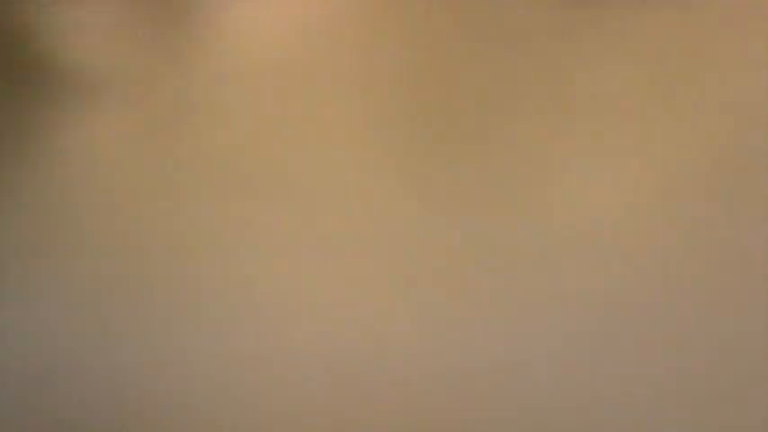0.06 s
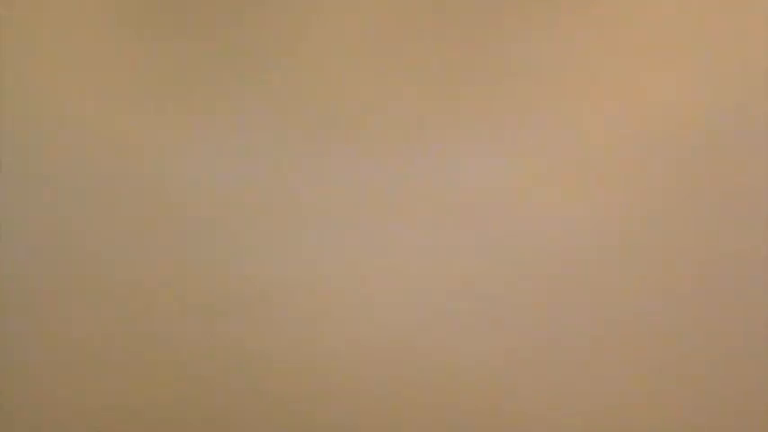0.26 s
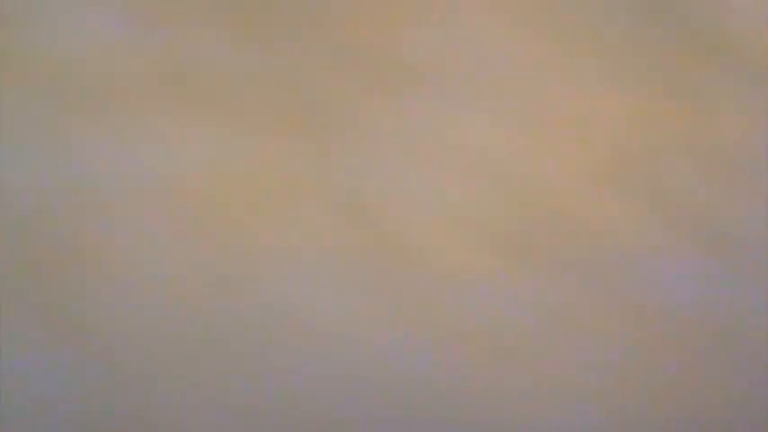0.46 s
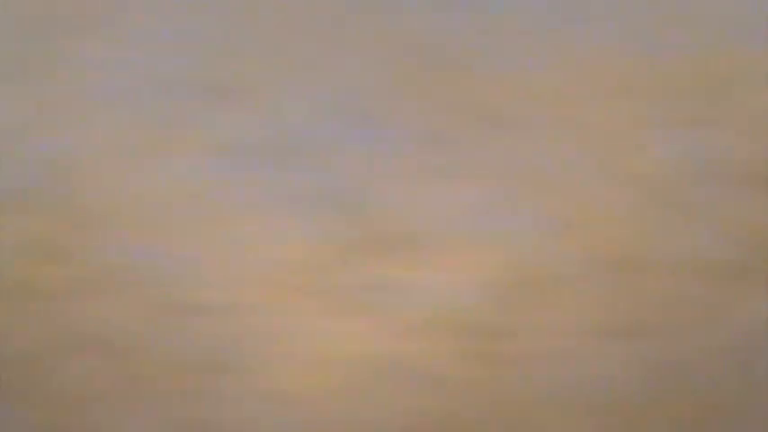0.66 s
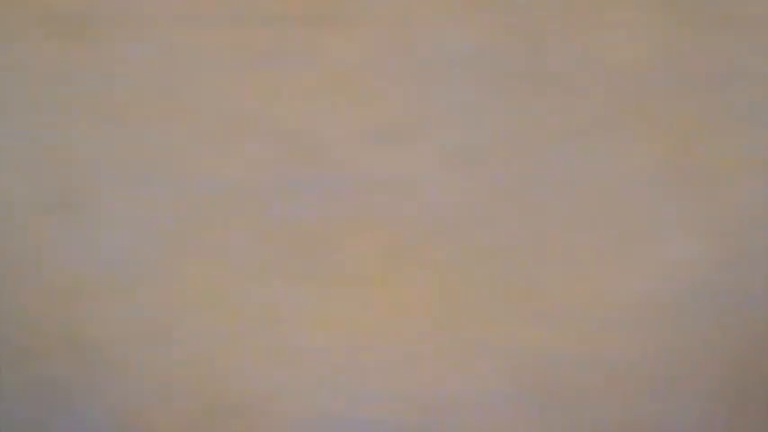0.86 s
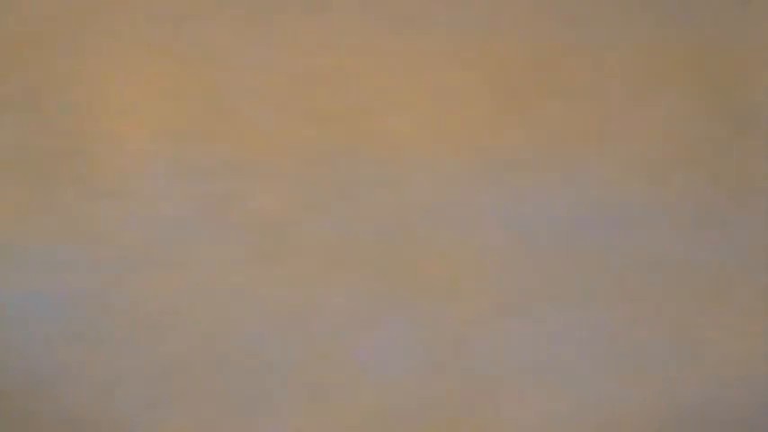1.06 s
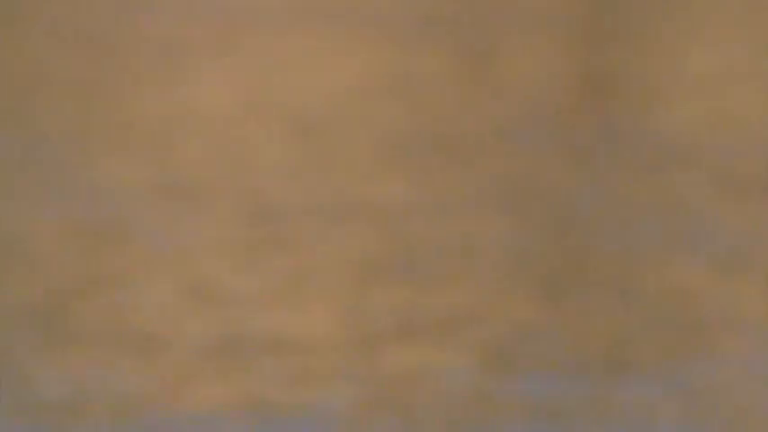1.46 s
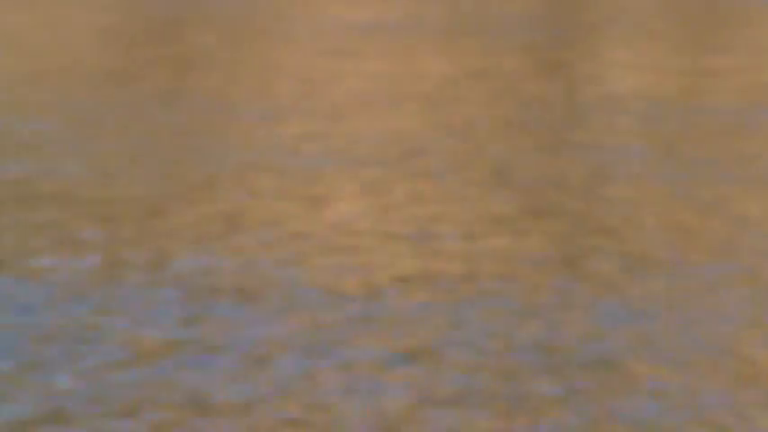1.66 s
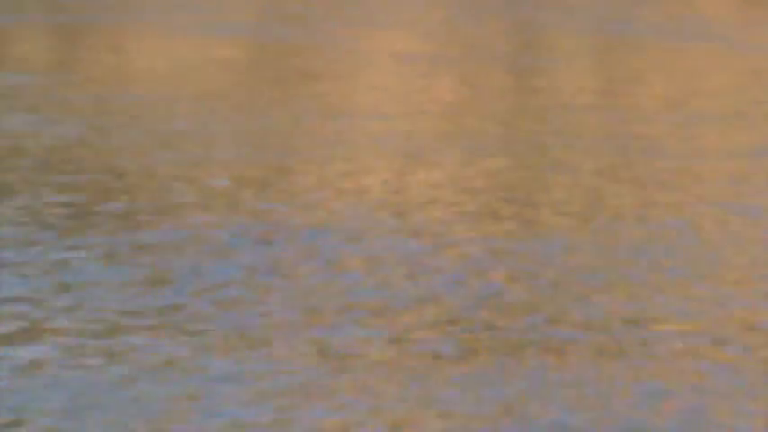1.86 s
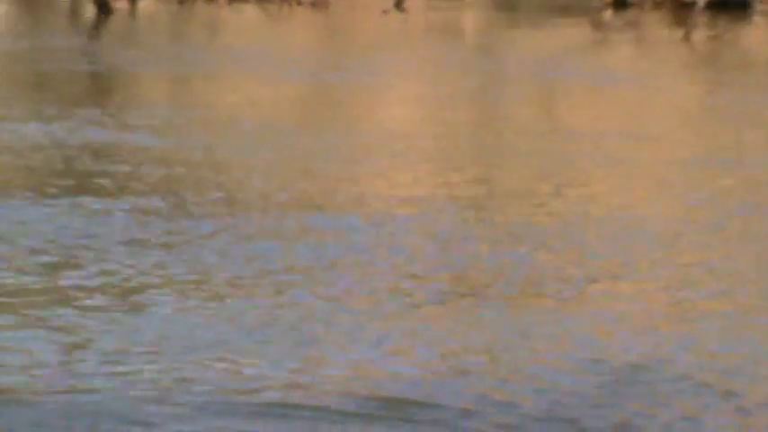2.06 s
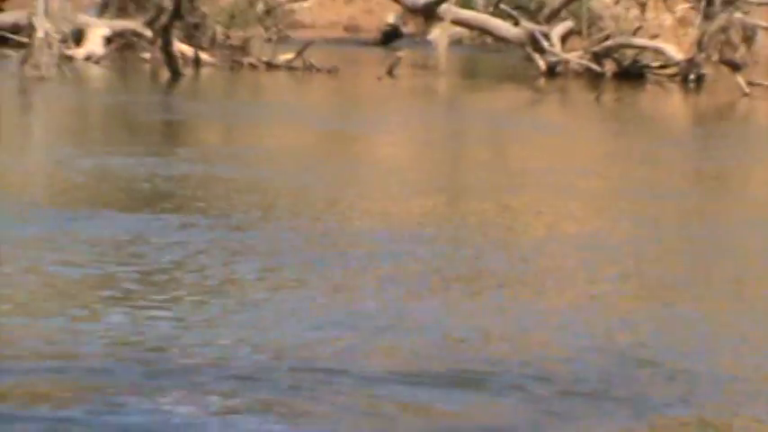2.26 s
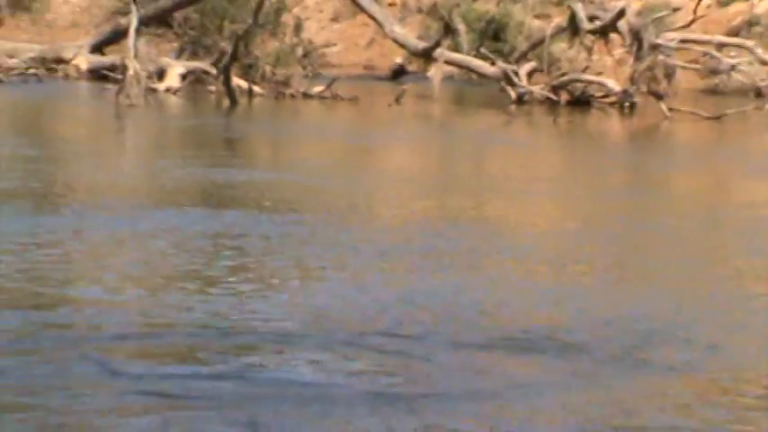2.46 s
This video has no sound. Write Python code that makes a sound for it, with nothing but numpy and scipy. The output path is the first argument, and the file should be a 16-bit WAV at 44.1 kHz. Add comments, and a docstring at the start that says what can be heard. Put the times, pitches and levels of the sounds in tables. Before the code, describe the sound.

A camera is bumped twice, over faint river wash and soft wind rumble on the microphone.

```python
"""Light gusts rumble on the microphone of a hand-held camera, over a quiet river wash and hiss.
Right at the microphone the camera's drive hums and the grip rustles; crickets trill faintly on the bank.
The camera is bumped twice in the first half second: its plastic shell scuffs and knocks, a finger rubs,
then a hard part snaps home. A dry scrape and small ticks follow; lens motors whirr in the second half."""
import sys
import numpy as np
from scipy import signal
from scipy.fft import rfft, irfft, next_fast_len
from scipy.io import wavfile

SR = 44100
rng = np.random.default_rng(int(sys.argv[2]) if len(sys.argv) > 2 else 0)


def generate_wav(signal):
    """Clip the signal to [-1, 1] and save it as 16-bit WAV at the path in sys.argv[1]."""
    frames = np.transpose(np.atleast_2d(signal))
    scaled = np.clip(frames, -1, 1) * 32767
    pcm = np.round(scaled).astype(np.int16)
    wavfile.write(sys.argv[1], SR, pcm)


N = 110250
T = np.arange(N) / SR


def from_db(db):
    """Decibels to gain."""
    return 10 ** (np.asarray(db) / 20)


def rms_one(x):
    """Scale to rms 1."""
    return x / np.sqrt(np.mean(x ** 2) + 1e-20)


def panned(db):
    """Left and right gains for a pan in dB, positive to the left."""
    return from_db(np.array([[.5], [-.5]]) * db)


def in_time(rows):
    """Each column of a curve at every sample."""
    s, *columns = np.transpose(rows)
    return [np.interp(T, s, c) for c in columns]


def at_hz(points, hz):
    """Read a spectrum on a log-frequency axis."""
    f, value = np.transpose(points)
    return np.interp(np.log(hz), np.log(f), value)


def drift(rate_hz):
    """A smooth random wander with spread 1."""
    step, settle = 40, 2000
    r = np.exp(-2 * step * np.pi * rate_hz / SR)
    white = rng.standard_normal(N // step + settle + 2)
    slow = signal.lfilter([1], [1, -2 * r, r * r], white)[settle:]
    return np.interp(np.arange(N) / step, np.arange(len(slow)), rms_one(slow))


def click(s):
    """One unit click at s seconds."""
    out = np.zeros(N)
    out[int(np.clip(s * SR, 0, N - 1))] = 1
    return out


def swell(s, rise, fall):
    """Exponential rise to 1 at s seconds, then exponential fall."""
    return np.exp(-np.maximum((s - T) / rise, (T - s) / fall))


def ring(clicks, hz, t60):
    """A unit click sets a sine of height 1 ringing."""
    r, w = np.exp(-np.log(1000) / (t60 * SR)), 2 * np.pi * hz / SR
    return signal.lfilter([0, np.sin(w)], [1, -2 * r * np.cos(w), r * r], clicks + 1e-18)


def above(x, hz, order):
    """High-pass."""
    return signal.sosfilt(signal.butter(order, hz, "high", fs=SR, output="sos"), x + 1e-18)


def narrow_noise(phase, width_hz):
    """A tone that wavers at random in level and phase; rms 1."""
    return drift(width_hz) * np.cos(phase) + drift(width_hz) * np.sin(phase)


def banded_noise(spectrum, likeness, flicker_db):
    """Stereo noise in flickering half-octave bands; rms 1."""
    # Each row: frequency in Hz, then relative density in dB (spectrum) or left-right correlation (likeness).
    edges = 18 * 2 ** np.arange(0, 10.1, .5)
    out, white = 0, rng.standard_normal((2, 2, N))
    for k, (low, high) in enumerate(zip(edges, edges[1:])):
        if high < spectrum[0][0] or low > spectrum[-1][0]:
            continue
        band = signal.butter(2, [low, high], "band", fs=SR, output="sos")
        mid, side = signal.sosfilt(band, white[k % 2])
        hz = np.sqrt(low * high)
        alike = np.clip(at_hz(likeness, hz), -1, 1)
        gain = from_db(at_hz(spectrum, hz) + flicker_db * drift(10.0))
        out = out + gain * (np.sqrt(1 + alike) * mid + np.sqrt(1 - alike) * side * [[1], [-1]])
    return rms_one(out)


def wind():
    """Gusts blow straight across the microphone ports in a lumpy rumble."""
    # Each row: time in seconds, level in dB, pan in dB.
    gusts = [(0.0, -55, 7), (0.04, -55, -2.5), (0.26, -61, 2.5), (0.38, -50.5, -0.5), (0.45, -50, -2.5),
             (0.47, -64, -1.5), (1.01, -64.5, 0.5), (1.05, -57, 1), (1.25, -62, -1), (1.34, -43, 2),
             (1.44, -44, -3.5), (1.47, -51.5, 3), (1.59, -36.5, -3.5), (1.66, -52.5, 13), (1.675, -46, 6),
             (1.72, -63, -0.5), (1.96, -53, 1), (2.05, -57.5, 0), (2.08, -43.5, -0.5), (2.15, -44.5, -9),
             (2.19, -52.5, 6), (2.21, -43.5, 2.5), (2.255, -43.5, -7.5), (2.31, -62.5, 2), (2.5, -66, -4)]
    # The rumble. Each row: frequency in Hz, relative density in dB.
    spectrum = [(20, 0), (40, 3.5), (90, -3), (160, -12.5), (300, -27.5), (500, -40.5), (900, -48)]
    # Each row: frequency in Hz, correlation between the ports.
    likeness = [(30, 1), (70, 0.66), (400, 0.42)]
    gust_db, pan_db = in_time(gusts)
    return from_db(gust_db + 0.5) * panned(pan_db) * banded_noise(spectrum, likeness, flicker_db=0)


def wash():
    """Quiet moving water and even hiss, heard wide from the bank."""
    # Each row: frequency in Hz, relative density in dB.
    spectrum = [(100, -5), (300, -10.5), (450, -9), (600, -7), (850, -5), (1200, -5), (2000, -8),
                (2800, -12.5), (6300, -14.5), (7500, -18), (9000, -21), (11000, -22.5), (12300, -20.5),
                (16000, -23.5)]
    # Each row: time in seconds, level in dB.
    level = [(0, -60), (.4, -58.5), (.6, -63), (1.1, -62), (1.6, -61), (2.5, -60)]
    # Each row: frequency in Hz, correlation between the ports.
    likeness = [(150, 0.59), (900, 0.16), (2400, 0.14), (6000, 0.29), (14000, 1)]
    return from_db(in_time(level)[0]) * banded_noise(spectrum, likeness, flicker_db=1.12)


def drive():
    """The camera's drive hums steadily, in the same body as the microphone."""
    # Each row: frequency in Hz, rms level in dB.
    partials = [(840, -77), (2520, -87.5)]
    hum = sum(from_db(db) * np.sin(2 * np.pi * hz * T + 0.12 * drift(3.8)) for hz, db in partials)
    return np.sqrt(2) * hum * panned(db=-6)


def crickets():
    """Faint crickets to the right: each wing stroke is one pulse of a thin tone that falls in pitch."""
    # Each row: pitch in Hz, strokes per second, pitch swing in Hz, pan in dB, curve of (seconds, dB).
    singers = [(6078, 64, 75, -4, [(0, -76), (.42, -72), (.6, -73), (.8, -81), (1.05, -73), (1.4, -79),
               (1.58, -73.5), (2.5, -70.5)]), (6430, 66, 150, -1, [(0, -76.5), (.7, -81), (1.05, -80),
               (1.5, -80), (1.7, -82)]), (4310, 41, 25, -6, [(1.05, -105), (1.12, -80), (1.45, -77),
               (1.52, -79), (1.58, -105)])]
    sharpness, uneven_db = 1.3, 2
    out = 0
    for hz, rate, swing_hz, pan_db, level in singers:
        stroke = 2 * np.pi * rate * T + 0.27 * drift(1.4)
        pulse = (.5 + .5 * np.cos(stroke)) ** sharpness * from_db(uneven_db * drift(19))
        tone = np.cos(2 * np.pi * hz * T + swing_hz / rate * np.cos(stroke) + drift(30))
        out = out + from_db(in_time(level)[0]) * panned(pan_db) * rms_one(pulse * tone)
    return out


def rustle():
    """The grip shifts with a soft rustle, close to the microphone."""
    # Each row: time in seconds, level in dB.
    level = [(0, -91), (.8, -71), (1.2, -67.5), (1.45, -64), (1.75, -85.5), (2.5, -68)]
    # Each row: frequency in Hz, relative density in dB.
    spectrum = [(280, -3), (480, 1), (750, -0.5), (1100, -5.5), (1600, -11)]
    noise = banded_noise(spectrum, likeness=[(300, 0.81), (1500, 0.71)], flicker_db=2.0)
    return from_db(in_time(level)[0]) * noise


def contact(force, treble_db):
    """A harder contact brightens the force, a softer one dulls it."""
    return force + (from_db(treble_db) - 1) * above(force, hz=1720, order=1)


def later_right(pair, lag_s):
    """The right port hears the sound a little later."""
    size = next_fast_len(N + 100)
    delay = np.exp(-2j * np.pi * np.arange(size // 2 + 1) * SR / size * lag_s)
    return np.array([pair[0], irfft(rfft(pair[1], size) * delay, size)[:N]])


def shell(force):
    """The plastic shell around the microphone rings under a force; it is too small to sound bass."""
    # Each row: frequency in Hz, level in dB, t60 in seconds, pan in dB, signed weight.
    modes = [(713, -8.5, 0.024, 2, 0.66), (949, -6.5, 0.037, 4.5, 0.55), (1093, -3, 0.021, 5.5, -1.09),
             (1370, -11.5, 0.027, 3, 0.75), (1613, -13.5, 0.025, -5, 0.86), (1930, -15, 0.0067, 5.5, 3.5),
             (1847, -20, 0.062, -3, .5), (2820, -17, 0.0036, 15.5, 1.7), (3780, -12.5, 0.0021, 8.5, 1.4),
             (4670, -13.5, 0.0022, -20, -0.7), (8800, -5, 0.00077, -8.5, 0.5)]
    rings = sum(weight * from_db(db) * panned(pan_db) * ring(force, hz, t60)
                for hz, db, t60, pan_db, weight in modes)
    return later_right(above(rings, hz=505, order=3), lag_s=.000085)


def knocks():
    """Single blows on the shell, harder or softer; those landing near a thin panel set it ringing."""
    # Each row: start in seconds, level in dB, pan in dB, contact treble in dB, panel's share in dB.
    blows = [(.2200, -42, 15, 5, -4.5), (0.2232, -42.5, -12, -6, -6), (0.2295, -33, 2, 4, 0),
             (0.2322, -25.5, -3, -18, -30), (0.265, -48.5, 1, 5.5, -3), (0.434, -44, -5, 6, 3),
             (0.4386, -14.5, -1, -2, -24), (.4396, -26, 12, -11, -29), (0.542, -42.5, -6, -16, -29),
             (1.178, -48.5, -2, 3.5, -25), (1.3223, -41.5, -4, -20, -29), (1.329, -50, -9, 7, -19)]
    force = on_panel = 0
    for s, db, pan_db, treble_db, panel_db in blows:
        blow = from_db(db) * panned(pan_db) * click(s)
        force = force + contact(blow, treble_db)
        on_panel = on_panel + from_db(panel_db) * blow
    return shell(force) + ring(on_panel, hz=2567, t60=0.021)


def slips(per_s=1500, spread_db=1.5):
    """Dense stick-slip clicks of uneven size."""
    sizes = from_db(spread_db * np.minimum(rng.exponential(1, N), 3))
    signs = rng.choice([-1, 1], N)
    return sizes * signs * (rng.random(N) < per_s / SR)


def scuffs():
    """The hand's friction swells and rings the shell; its crisp edge reaches the microphone directly."""
    # Each row: peak time in seconds, level in dB, rise and fall in seconds,
    # then pan, contact treble and the edge's share, all in dB.
    strokes = [(0.2294, -34, 0.007, 0.0032, -2.5, 6, -24), (0.265, -58, 0.019, 0.013, -3, 9, -18),
               (0.325, -54, 0.018, 0.0066, -2, -1.5, -20), (0.436, -38, 0.0094, 0.011, 3.5, 4.5, -32)]
    grain = slips() + 0.82 * np.array([slips(), slips()])  # shared slips, plus each side's own
    force = edge = 0
    for s, db, rise, fall, pan_db, treble_db, edge_db in strokes:
        pressure = from_db(db) * panned(pan_db) * swell(s, rise, fall)
        force = force + pressure * contact(grain, treble_db)
        edge = edge + pressure * from_db(edge_db) * grain
    return (shell(force) + above(edge, hz=7000, order=2)) / np.std(shell(grain))


def snaps():
    """A hard part of the camera snaps home once; its faint ticks at other times stir the low modes less."""
    # Each row: start in seconds, level in dB, extra level for the low modes in dB.
    hits = [(.2700, -49, -5), (.2800, -53, -8), (0.4543, -16.5, 3), (1.869, -49.5, -2)]
    # Each row: frequency in Hz, level in dB, t60 in seconds, pan in dB.
    modes = [(1240, -6.5, 0.005, 10.5), (1990, -17.5, 0.0048, 10), (3260, -4.5, 0.0017, 14.5),
             (8730, 3, 0.001, 3.5), (10000, -12, 0.0065, -5), (11840, -3.5, 0.003, -4),
             (15500, -12, .001, -4)]
    bright = sum(from_db(db) * click(s) for s, db, _ in hits)
    low = sum(from_db(db + low_db) * click(s) for s, db, low_db in hits)
    rings = 0
    for k, (hz, db, t60, pan_db) in enumerate(modes):
        polarity = (-1) ** (k // 2)
        force = low if hz < 5000 else bright
        rings = rings + polarity * from_db(db) * panned(pan_db) * ring(force, hz, t60)
    return above(rings, hz=816, order=2)


def rubs():
    """A finger drags on the shell in short, rough, sagging notes."""
    # Each row: peak time in seconds, level in dB, half length in seconds, pitch in Hz.
    drags = [(0.284, -63, 0.0075, 1116), (0.317, -56.5, 0.01, 1038)]
    sag_hz_per_s = 3000
    out = 0
    for s, db, half_length, hz in drags:
        t = T - s
        pressure = from_db(db) * np.exp(-.5 * (t / half_length) ** 2)
        phase = 2 * np.pi * (hz - .5 * sag_hz_per_s * t) * t
        out = out + pressure * narrow_noise(phase, width_hz=39)
    return out * panned(db=4.0)


def scrapes():
    """A light, dry scrape with a faint tail, just right of centre."""
    # Each row: peak time in seconds, level in dB, rise and fall in seconds.
    strokes = [(1.068, -53, 0.0026, 0.0028), (1.098, -69.5, .015, .022)]
    # Each row: frequency in Hz, relative density in dB.
    spectrum = [(3500, -11), (4800, -3), (6500, 0), (9000, 5), (12000, -9), (16000, -18)]
    pressure = sum(from_db(db) * swell(s, rise, fall) for s, db, rise, fall in strokes)
    noise = banded_noise(spectrum, likeness=[(4000, 0.65), (12000, 0.86)], flicker_db=1.5)
    return pressure * panned(db=-2) * noise


def lens():
    """The lens motors whirr beside the microphone in narrow resonances, throbbing with each turn."""
    # Each row: start and end of full level in seconds, frequency in Hz, width in Hz, level in dB.
    motors = [(1.55, 2.23, 1130, 37, -71.5), (1.55, 2.38, 1230, 120, -70.5), (1.55, 3.1, 1300, 26, -73.5)]
    ramp_s, turns_per_s = 0.2, 33
    whirr = 0
    for start, end, hz, width_hz, db in motors:
        running = np.clip(np.minimum(T - start, end - T) / ramp_s + 1, 0, 1)
        whirr = whirr + from_db(db) * running * narrow_noise(2 * np.pi * hz * T, width_hz)
    throb = 1 + 0.4 * np.sin(2 * np.pi * turns_per_s * T + drift(2.7))
    return whirr * throb * panned(db=-4.0)


def scene():
    """Handling noise and camera works up close; crickets, wind and water on the bank around them."""
    handling = knocks() + scuffs() + rubs() + scrapes() + snaps() + rustle()
    return handling + drive() + lens() + crickets() + wind() + wash()


def record(dry):
    """A steep low-pass removes the treble above 16.6 kHz."""
    cutoff_hz = 16600
    return signal.sosfilt(signal.ellip(10, .1, 70, cutoff_hz, fs=SR, output="sos"), dry)


dry = scene()
out = record(dry)
generate_wav(out)
```